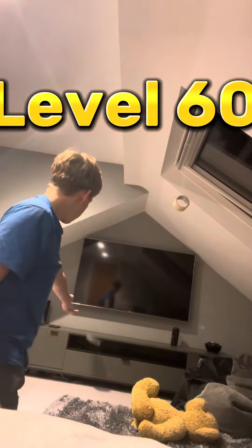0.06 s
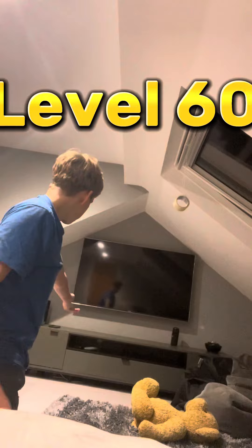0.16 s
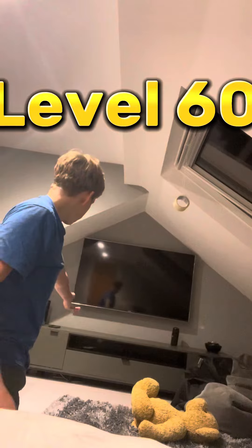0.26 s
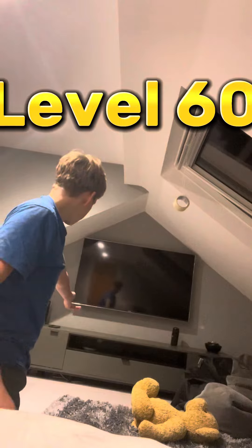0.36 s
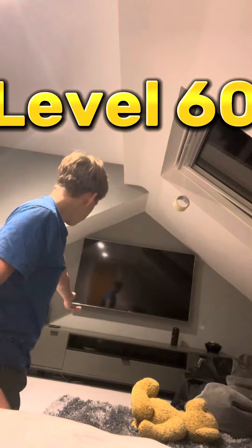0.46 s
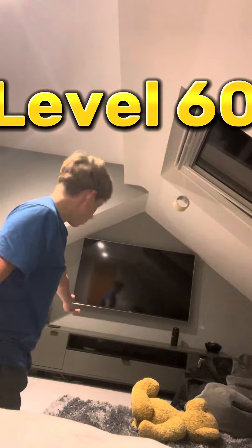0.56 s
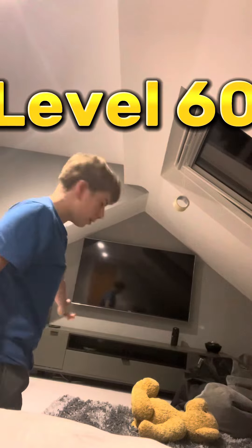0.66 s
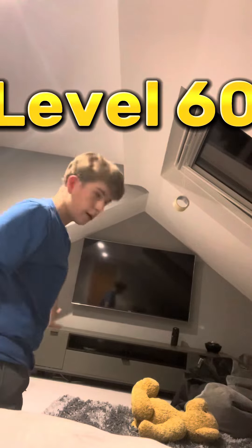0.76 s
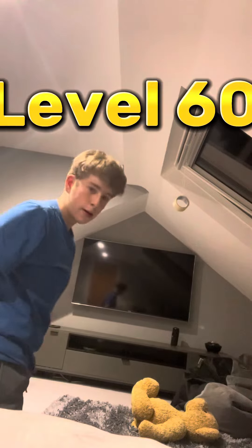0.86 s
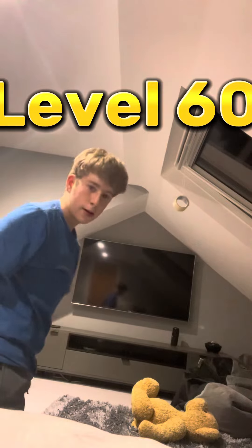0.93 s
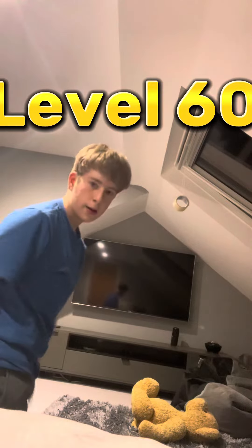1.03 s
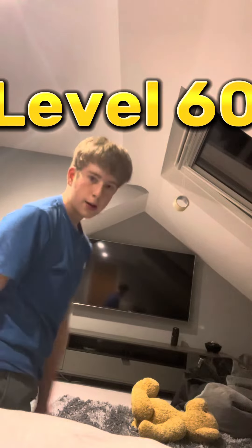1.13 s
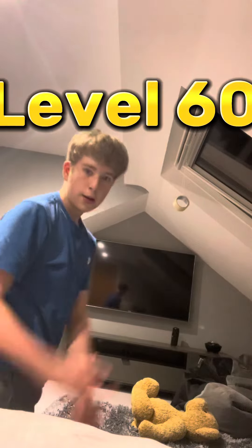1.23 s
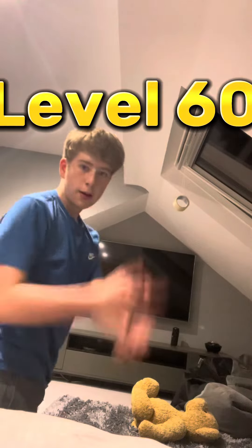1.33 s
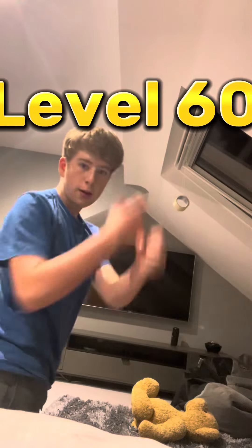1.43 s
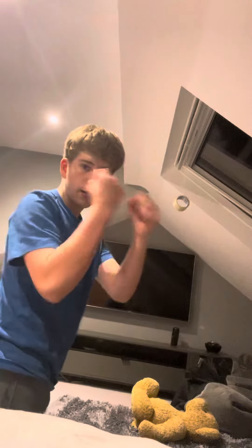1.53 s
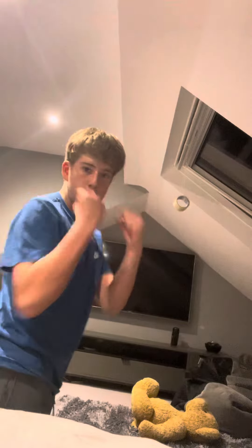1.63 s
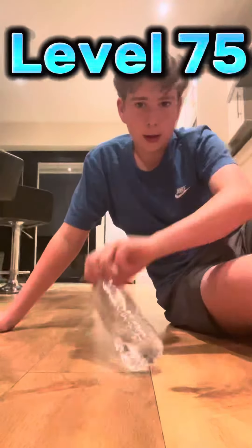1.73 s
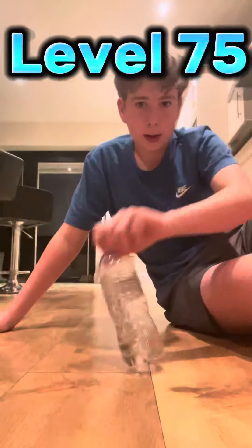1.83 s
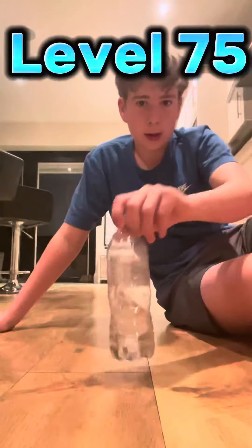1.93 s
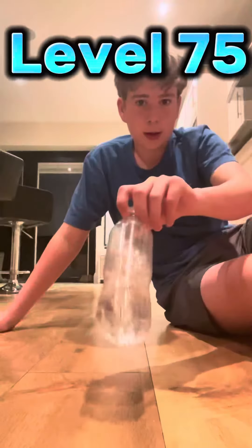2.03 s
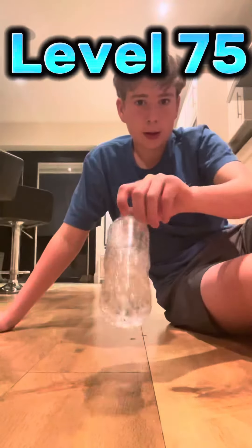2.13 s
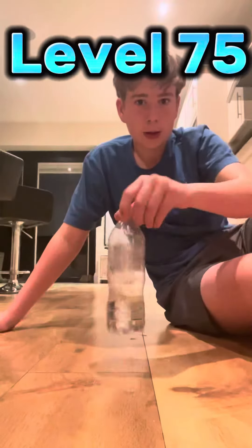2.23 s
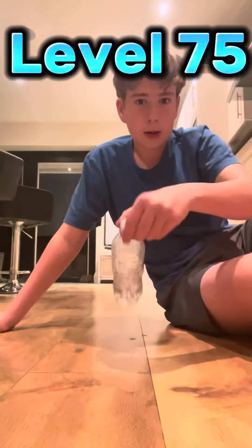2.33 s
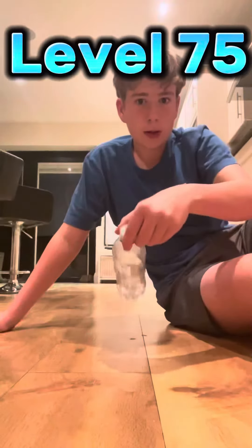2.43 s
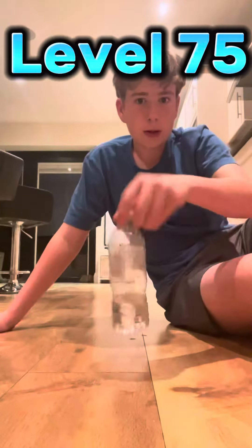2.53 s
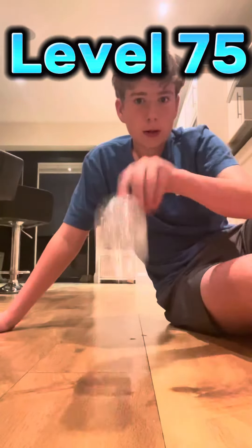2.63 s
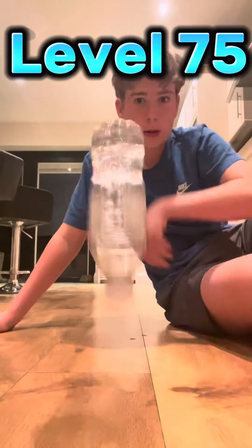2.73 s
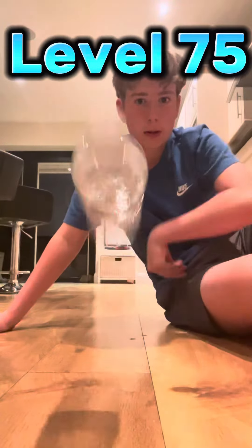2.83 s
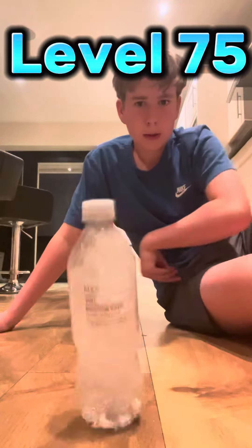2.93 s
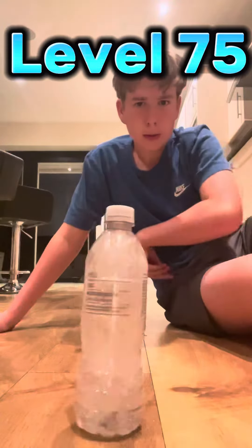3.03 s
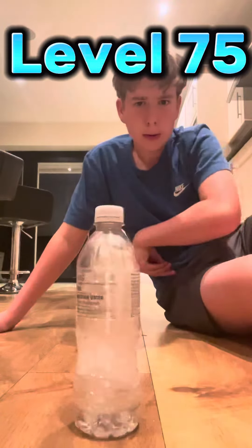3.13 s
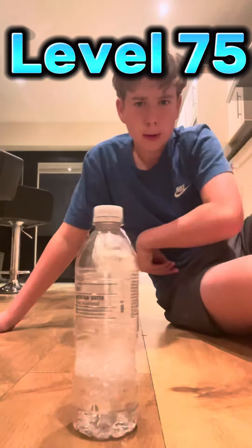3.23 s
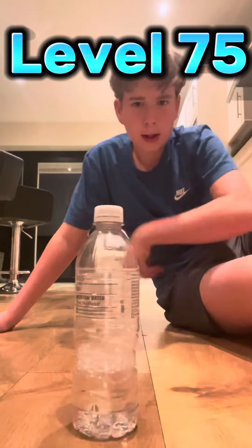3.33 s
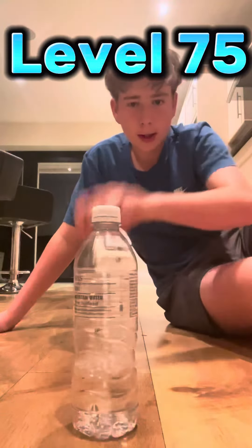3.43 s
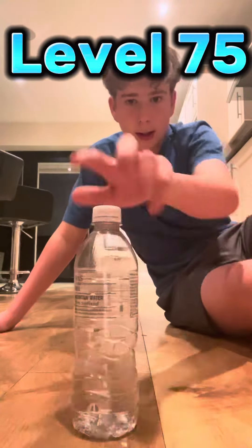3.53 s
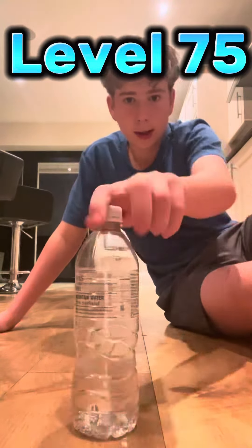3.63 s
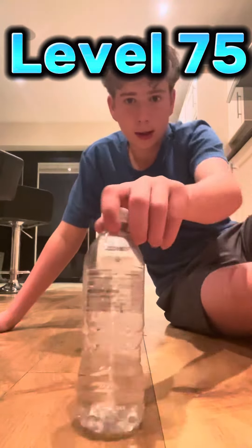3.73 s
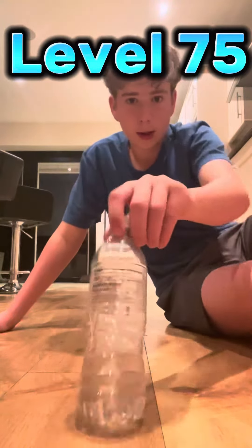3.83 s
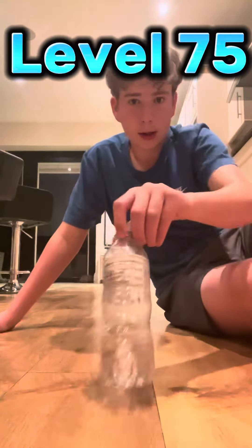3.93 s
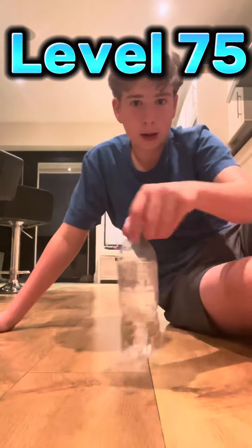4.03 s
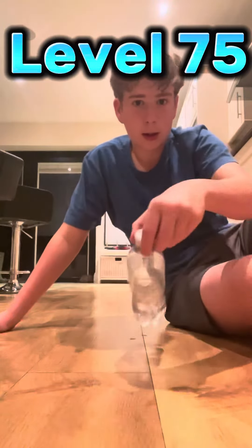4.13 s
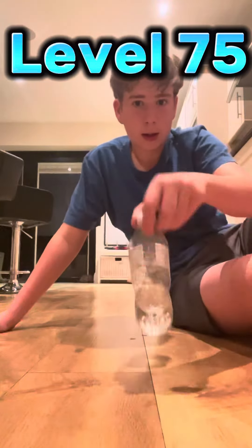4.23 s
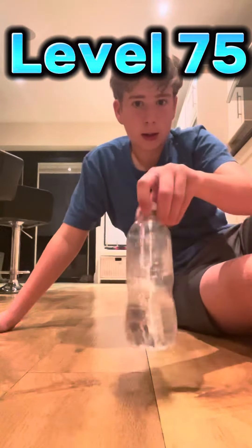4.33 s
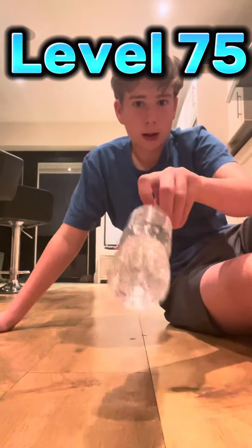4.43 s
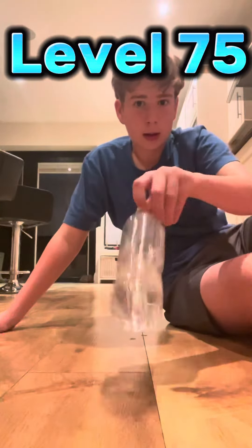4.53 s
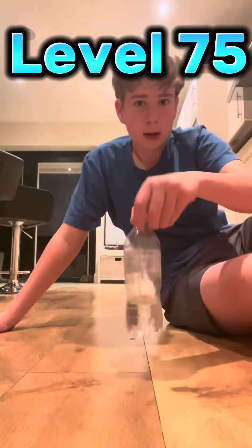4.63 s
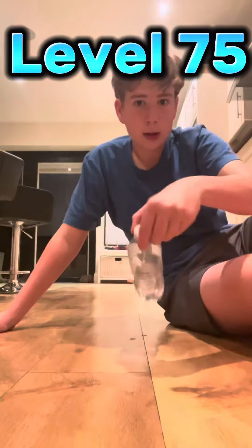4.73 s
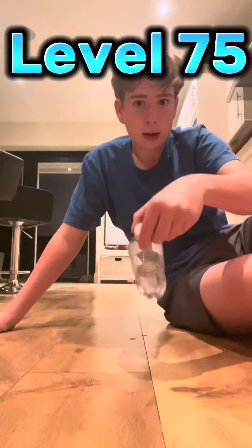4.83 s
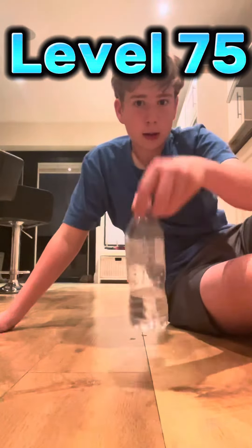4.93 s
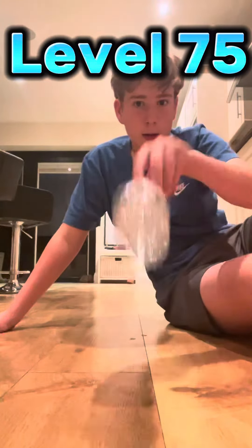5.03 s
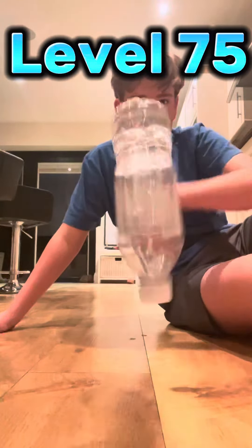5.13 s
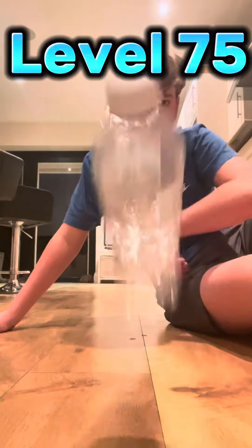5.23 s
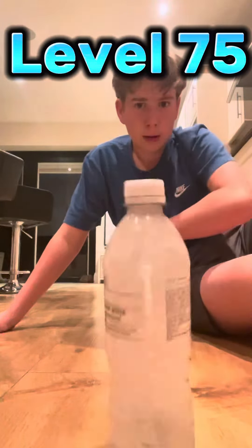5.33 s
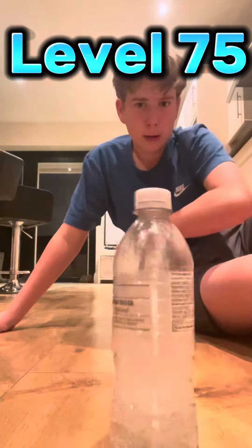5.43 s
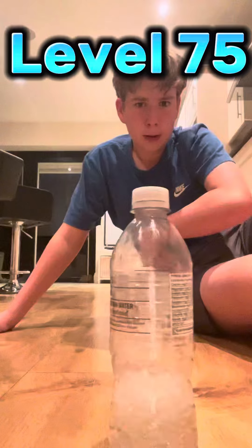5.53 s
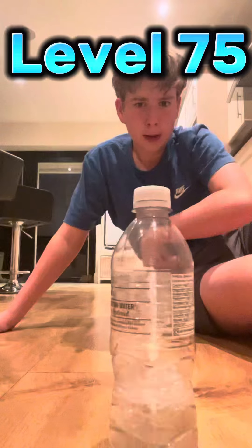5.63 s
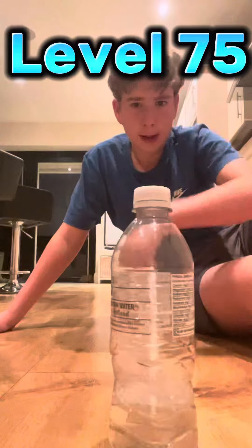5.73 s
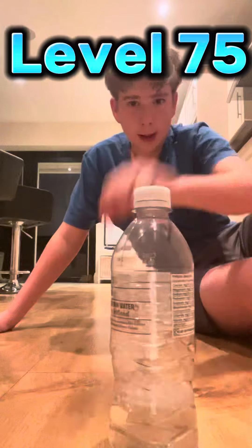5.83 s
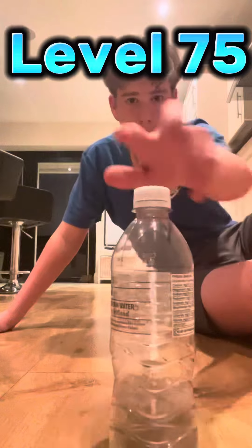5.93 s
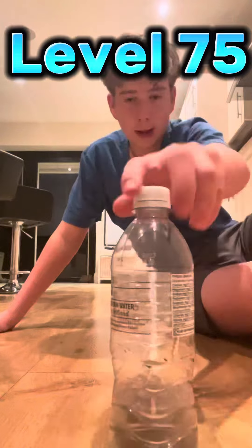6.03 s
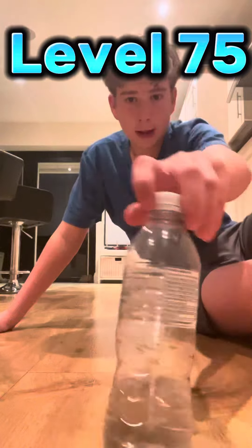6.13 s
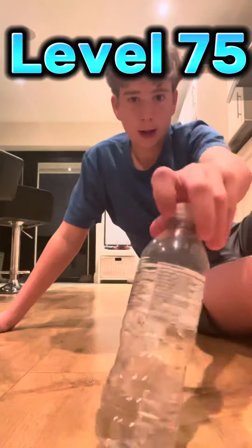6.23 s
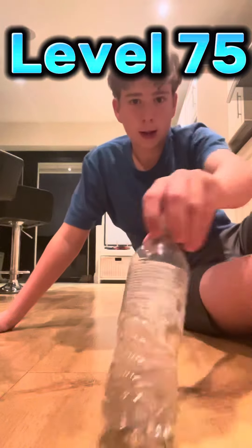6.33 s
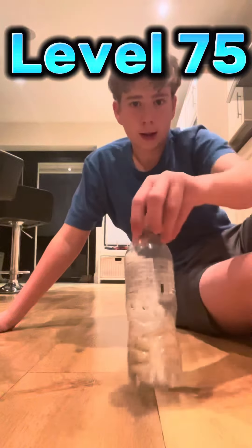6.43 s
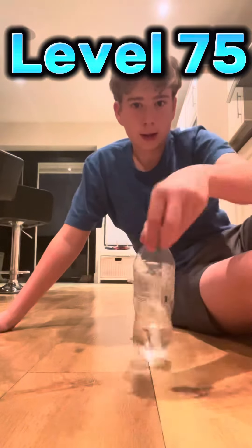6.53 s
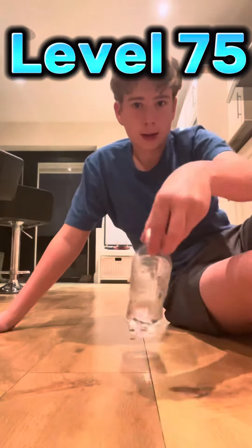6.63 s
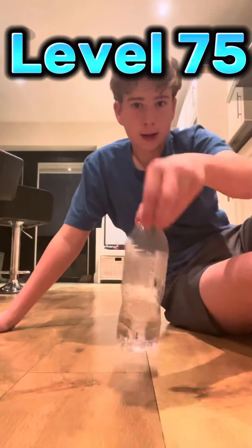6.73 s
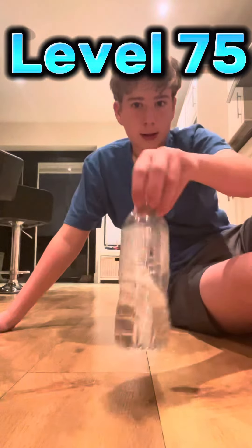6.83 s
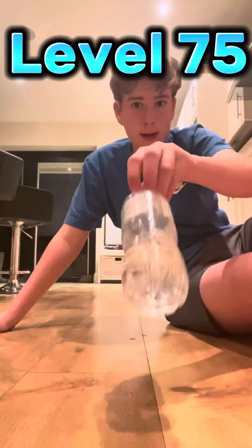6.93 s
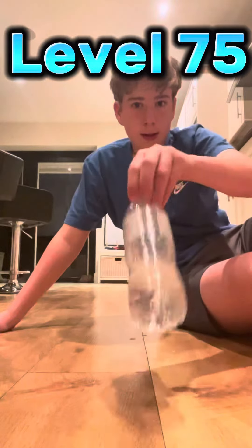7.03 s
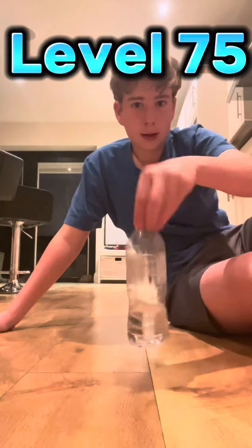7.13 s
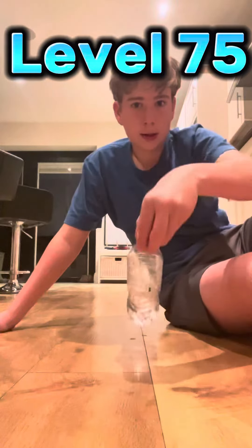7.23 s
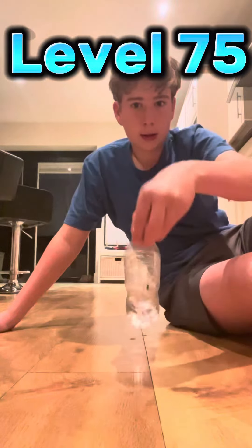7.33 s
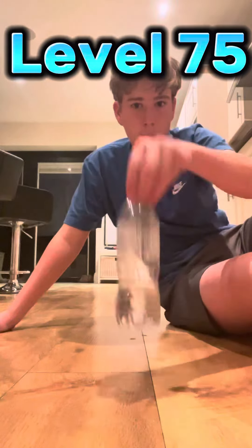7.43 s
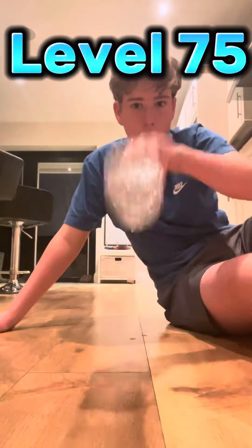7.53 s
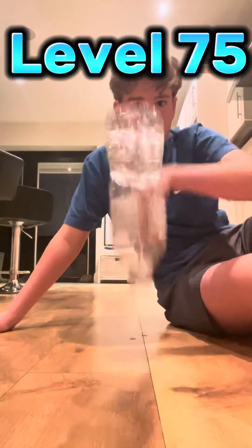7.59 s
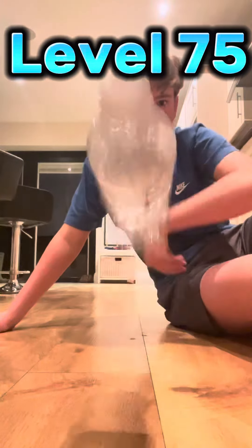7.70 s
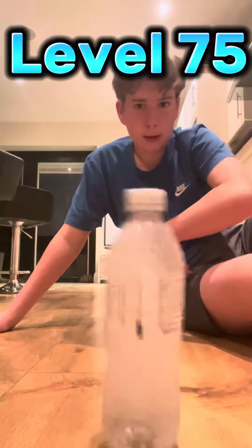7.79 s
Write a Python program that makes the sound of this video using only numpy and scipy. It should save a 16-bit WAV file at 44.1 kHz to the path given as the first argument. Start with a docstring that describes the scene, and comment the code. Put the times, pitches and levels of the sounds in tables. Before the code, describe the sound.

A distant bottle clatters onto a cabinet in an echoing room, then close by water sloshes, plastic snaps and three landings knock a wooden floor.

```python
"""In an attic room with low rumble, a part-filled plastic bottle lands far off on a cabinet: damped modes and a noise
clatter, mostly reverberant, then swells of slosh and rustle. Then a wooden kitchen floor is close by, under a
wavering hum. Three times the bottle is flipped: snapping wall clicks, sloshing water as swells of coloured noise,
a flick of the wrist, then a landing with a low ring of boards and bottle and a crack that sweeps downwards.
The trapped air hoots on low, slightly unsteady notes, each with its own pitch."""
import sys
import numpy as np
from scipy import signal
from scipy.fft import rfft, irfft, next_fast_len
from scipy.io import wavfile
from scipy.ndimage import uniform_filter1d, map_coordinates

SR = 44100
rng = np.random.default_rng(int(sys.argv[2]) if len(sys.argv) > 2 else 0)


def to_wav(s):
    """Save 16-bit WAV."""
    ch = np.atleast_2d(s).T  # columns
    pcm = np.round(np.clip(ch, -1, 1) * 32767)  # PCM
    wavfile.write(sys.argv[1], SR, pcm.astype(np.int16))


N = 346626

# Attic rumble colour. Each row: frequency in Hz, relative density in dB per Hz.
RUMBLE_COLOUR = [(12, -33), (20, -16), (87, -1.5), (130, -19.5), (177, -9), (245, -33.5), (437, -38),
                 (500, -43.5), (650, -72.5), (1100, -120)]
# Colour of the attic's slosh and rustle. Each row: frequency in Hz, relative density in dB per Hz.
ATTIC_NOISE_COLOUR = [(180, -41), (300, -9.5), (434, -5), (471, -9), (762, -6), (1160, -12), (1910, -11.5),
                      (4540, -17.5), (14000, -38)]
# Noise swells in the attic: slosh after the far landing, then rustle.
# Each row: peak in seconds, rise in seconds, fall in seconds, level in dB.
ATTIC_SWELLS = [(.33, 0.24, 0.176, -59), (.45, 0.12, .05, -69.5), (1.23, .15, 0.46, -72.5),
                (1.56, 0.24, 0.1, -68)]
# Kitchen air colour. Each row: frequency in Hz, relative density in dB per Hz.
ROOM_AIR_COLOUR = [(12, -51), (20, -31.5), (47, -17), (141, -0.5), (166, -11.5), (197, -19), (406, -14),
                   (730, -32.5), (11200, -47.5), (15700, -66.5)]
# How alike left and right sound. Each row: frequency in Hz, likeness from -1 to 1.
LIKENESS = [(60, 1), (240, 0.81), (950, 0.22), (3770, -0.053), (15000, 0.93)]
# Reverb decay, stretched by each user's scale. Each row: frequency in Hz, time to fall 60 dB in seconds.
ROOM_DECAY = [(100, .5), (500, .5), (2500, 0.38), (10000, 0.29)]
# Phase lead at the two microphone ports, at full share. Each row: frequency in Hz, left lead in radians.
PORT_LEAD = [(200, -1.16), (600, -0.9), (2070, -1.23), (3100, 1.65), (5170, 2.16), (8800, 0.9),
             (12000, -2.5), (15400, -4.5)]
# Level lean at the two ports, at full share. Each row: frequency in Hz, left minus right in dB.
PORT_LEAN = [(60, -1.5), (180, 0), (550, -4), (1650, -1.5), (4970, 0.5), (15000, 1.5)]
# Where the bottle is. Each row: start in seconds, place by name.
PLACES = [(0, "floor"), (1.8, "hand"), (2.6, "air"), (2.916, "floor"), (3.7, "hand"), (4.95, "air"),
          (5.294, "floor"), (6.38, "hand"), (7.45, "air"), (7.764, "floor")]
# For each place: share of the splash that hisses in the neck (0 to 1).
NECK_SHARE = {"floor": .2, "hand": 0.4, "air": .8}
# For each place: floor thud over the bottle body in dB.
THUD_OVER_BODY_DB = {"floor": 1.5, "hand": -8, "air": -10}
# Surges of water, and at 5.23 s a brief soft noise swell just before the hit.
# Each row: peak in seconds, fall in seconds, splash level in dB, bottle body level in dB.
NOISE_SURGES = [(1.751, .18, -56, -49.5), (1.91, 0.16, -54.5, -64.5), (2.009, 0.2, -62.5, -64),
                (2.153, 0.045, -66, -55.5), (2.93, 0.16, -34, -36.5), (3.09, 0.18, -50, -40),
                (3.229, .05, -75.5, -42), (3.29, 0.13, -73.5, -50.5), (3.52, 0.083, -88, -51),
                (3.64, 0.06, -68, -51), (3.835, 0.077, -53, -56.5), (4.12, 0.063, -73, -62),
                (4.296, 0.068, -49.5, -54), (5.23, 0.014, -31, -55), (5.308, 0.12, -32, -39),
                (5.411, 0.21, -48, -41.5), (5.518, 0.089, -50.5, -44.5), (5.75, 0.16, -68.5, -56.5),
                (5.93, 0.046, -77, -59), (6.019, 0.076, -69, -47), (6.075, .075, -66, -52),
                (6.188, .11, -62.5, -49), (6.259, 0.026, -58, -61), (6.31, 0.077, -69.5, -47.5),
                (6.423, 0.076, -50, -55), (6.8, .12, -65.5, -66), (7.699, 0.048, -44, -46),
                (7.789, 0.11, -30, -31.5)]
# Flicks of the wrist. Each row: peak in seconds, splash level in dB.
THROWS = [(2.668, -48.5), (5.055, -46.5), (7.549, -47)]
# Water spatter colour. Each row: frequency in Hz, relative density in dB per Hz.
SPLASH_COLOUR = [(350, -32), (600, -4), (929, -11), (1140, -13), (1790, -15), (2880, -14.5), (4520, -21),
                 (6720, -24), (12800, -35.5), (15700, -46.5)]
# Resonances of the bottle's body. Each row: centre in Hz, width in Hz, relative level in dB.
BODY_RESONANCES = [(217, 45, -8.5), (286, 30, -2.5), (415, 40, -3.5), (520, 74, -10.5), (634, 71, -14.5)]
# Resonances of the bottle's neck. Each row: centre in Hz, width in Hz, relative level in dB.
NECK_RESONANCES = [(2160, 190, 0), (2933, 170, 2), (3460, 240, -9.5), (6520, 580, -11.5)]
# Hoots of the trapped air after a landing. Each row: start in seconds, hold in seconds, pitch in Hz, level in dB.
LANDING_HOOTS = [(2.96, 0.02, 300.3, -35), (3.138, 0.018, 262, -40), (5.305, .012, 282.3, -17),
                 (5.369, .12, 286, -35.5)]
# The hoot of each flick. Single row: delay in seconds, hold in seconds, pitch in Hz, level over splash in dB.
THROW_HOOT = (0.03, 0.0536, 272, -1.5)
# Snaps of the bottle wall, and the first edge touch at 5.238 s.
# Each row: time in seconds, dry peak before the room in dB, centre in Hz.
CLICKS = [(1.742, -41.5, 1330), (1.795, -38.5, 3830), (1.88, -48, 2880), (1.908, -38.5, 2180),
          (1.975, -41.5, 3550), (1.995, -36, 1628), (2.144, -42.5, 1860), (2.805, -48, 6253),
          (2.859, -41.5, 1915), (2.873, -33, 1800), (3.201, -47.5, 7950), (3.211, -43, 2500),
          (3.262, -46, 3313), (3.845, -41.5, 3466), (4.303, -32, 3320), (4.404, -44.5, 2315),
          (4.968, -54.5, 2960), (5.051, -35, 2802), (5.2383, -17.5, 1800), (6.032, -45.5, 2570),
          (6.08, -52, 2600), (6.13, -45.5, 3455), (6.176, -45, 3200), (6.215, -50, 2300),
          (6.247, -51, 2880), (6.337, -52, 6000), (6.392, -48, 7050), (6.779, -41, 2710),
          (7.497, -33, 2554), (7.543, -31.5, 2390), (7.551, -27.5, 2940), (7.629, -44, 6830),
          (7.681, -24, 2950), (7.744, -28, 3000)]
# Blows on the far cabinet. Each row: time in seconds, relative level in dB.
FAR_BLOWS = [(0.138, -36), (0.154, -26.5), (0.166, -18), (0.173, -19), (0.314, -30.5), (0.344, -38),
             (0.379, -49), (0.43, -52)]
# Cabinet modes. Each row: frequency in Hz, relative level in dB, time to fall 60 dB in seconds.
CABINET_MODES = [(76, -14.5, .2), (131.3, -12.5, 0.14), (190.4, -10, 0.16), (261.2, -12, 0.17),
                 (400, -14.5, 0.086), (699.5, -13, .08), (955, -10.5, 0.12), (1269, -1, 0.099),
                 (1544, -6, 0.052), (1917, -3.5, 0.13), (2300, -11.5, 0.061)]
# Blows on the boards. Each row: time in seconds, relative level in dB, low ring in dB over it, crack in dB over it.
BLOWS = [(2.9163, -1, -1, -1), (2.924, -14.5, 0, -12.5), (5.2391, -17, -13, 1.5), (5.2936, -5, 1.5, 3.5),
         (5.301, -11.5, 2.5, -9.5), (7.764, -24, 4.5, -3), (7.770, -21, 3.5, -6.5), (7.776, -14, 1, 2.5),
         (7.783, -8.5, -0.5, -4), (7.793, -11, 2.5, -27)]
# Modes of the floor boards and bottle at a landing.
# Each row: frequency in Hz, relative level in dB, time to fall 60 dB in seconds.
LANDING_MODES = [(62, -9, .2), (95, -3, 0.16), (126, -3.5, 0.098), (229, -9, 0.11), (296.3, 1.5, 0.11),
                 (409, -4, 0.046), (505.7, -5, 0.1), (596, -9, 0.023), (662.7, -4, 0.092),
                 (806, -13, 0.021), (989, -9, 0.08), (1040, -9.5, 0.022), (1345, -5.5, 0.02),
                 (1530.5, -8, 0.048)]
# Colour of the landing's crack. Each row: frequency in Hz, relative density in dB per Hz.
CRACK_COLOUR = [(530, -37.5), (900, -2), (1640, -9), (2130, -13), (2770, -5.5), (4680, -16.5),
                (9600, -21.5), (12600, -31.5), (15700, -65)]

ROOM_CHANGE_S, TOP_HZ = 1.68, 15820  # attic gives way to kitchen; upper band limit
RUMBLE_DB, STILL_DB, RUMBLE_SWELL_DB = -59, -83, 2  # rumble and rustle at rest; rumble over the noise in a swell
HUM_HZ, HUM_DB = 140.3, -64.5  # centres of the wavering pitch and level
HUM_DIP_DB, HUM_BACK_S = 8.5, .5  # depth of the dip at a landing, time constant of its return
SURGE_RISE_S, RISE_OVER_FALL = 0.011, .22  # a long surge also builds slowly
THROW_RISE_S, THROW_FALL_S, THROW_BODY_DB = .045, .085, 2  # body over splash
HOOT_RISE_S, HOOT_FALL_S = .022, .06  # times to change by 20 dB


def amp(db):
    """Decibels to linear gain."""
    return 10 ** (np.asarray(db) / 20)


def unit(x):
    """Scale to an rms of 1."""
    return x / np.sqrt(np.mean(x ** 2) + 1e-20)


def along(points, hz):
    """Read (Hz, value) points along a log frequency axis."""
    f, v = np.transpose(points)
    return np.interp(np.log(hz + 1), np.log(f + 1), v)


def colour(spectrum):
    """Gain over frequency from a table of densities."""
    return lambda hz: amp(along(spectrum, hz))


def wobble(rate):
    """A smooth random curve, rate knots a second."""
    knots = rng.standard_normal(int(N * rate / SR) + 4)
    return map_coordinates(knots, [np.arange(N) * rate / SR])


def filtered(x, response):
    """Shape x by a complex response of frequency."""
    m = next_fast_len(x.shape[-1] + 8192)
    spectrum = rfft(x, m) * response(np.fft.rfftfreq(m, 1 / SR))
    return irfft(spectrum, m)[..., :x.shape[-1]]


def resonances(modes):
    """Causal response of damped resonances, alternating in sign."""
    def response(f):
        return sum((-1) ** k * amp(db) * 1j * f * width / (centre ** 2 - f * f + 1j * f * width)
                   for k, (centre, width, db) in enumerate(modes))
    return response


def stereo(pair, gain=lambda hz: 1):
    """Turn two independent noises into left and right that are as alike as LIKENESS says."""
    def mid_side(hz):
        turn = np.arccos(np.clip(along(LIKENESS, hz), -1, 1)) / 2
        return gain(hz) * np.array([np.cos(turn), np.sin(turn)])
    mid, side = filtered(pair, mid_side)
    return np.array([mid + side, mid - side])


def rush(gain, grain_db=0, grain_rate=100):
    """Stereo noise of rms 1 with a colour, lumpy in time."""
    lumps = amp(grain_db * wobble(grain_rate))
    return unit(stereo(rng.standard_normal((2, N)) * lumps, gain))


def patchy(x, depth_db):
    """Random patches of gain across time and frequency."""
    z = signal.stft(x, nperseg=512)[2]
    field = uniform_filter1d(rng.standard_normal(z.shape[1:]), size=7, axis=0)
    field = uniform_filter1d(field, size=9, axis=1)
    return unit(signal.istft(z * amp(depth_db * unit(field)), nperseg=512)[1][:, :N])


def swells(rows, gains):
    """Envelopes of events that grow by 20 dB over their rise and lose 20 dB over their fall; a row per layer."""
    out = np.zeros((len(gains), N))
    for (s, rise, fall), gain in zip(rows, np.transpose(gains)):
        first, last = max(round((s - 3 * rise) * SR), 0), min(round((s + 3 * fall) * SR), N)
        span = np.arange(first, last)
        t = span / SR - s
        out[:, span] += gain[:, None] * amp(-20 * np.maximum(-t / rise, t / fall))
    return out


def ring(modes, t, spread_db, wander):
    """Damped modes at new strengths for each blow; their phases wander at random, which roughens the ring."""
    out = np.zeros(len(t))
    for hz, db, t60 in modes:
        walk = wander * np.cumsum(rng.standard_normal(len(t))) / np.sqrt(SR)
        decay = amp(db + rng.normal(0, spread_db) - 60 * t / t60)
        out += decay * np.sin(2 * np.pi * hz * t + hz / 20 * walk)
    return out


def add(track, s, sound):
    """Mix a sound in from time s."""
    part = track[round(s * SR):][:len(sound)]
    part += sound[:len(part)]


def ports(x, share):
    """One source at two microphone ports: a share of the lead and lean; long waves reach both in step."""
    def half(hz):
        short_waves = hz ** 4 / (hz ** 4 + 350 ** 4)
        lean = amp(share * along(PORT_LEAN, hz) / 2)
        return lean * np.exp(.5j * share * short_waves * along(PORT_LEAD, hz))
    return filtered(x, lambda hz: np.array([half(hz), 1 / half(hz)]))


def room(x, decays, scale, wet_db, share):
    """Direct sound plus a tail in which each frequency dies at its own speed."""
    hz, t, z = signal.stft(rng.standard_normal((2, SR * 3 // 4)), SR, nperseg=256)
    t60 = scale * along(decays, hz)[:, None]
    tail = signal.istft(z * amp(-60 * t / t60), SR, nperseg=256)[1]
    tail = stereo(tail / np.linalg.norm(tail[0]))
    delayed = np.pad(x, (150, 0))[None]  # samples before the tail
    wet = signal.fftconvolve(delayed, tail, axes=1)[:, :N]
    return ports(x, share) + amp(wet_db) * wet


def attic():
    """Low rumble and patchy noise, swelling together: slosh after the far landing, then rustle."""
    rows = np.array(ATTIC_SWELLS)
    swell, = swells(rows[:, :3], [amp(rows[:, 3])])
    rumble = rush(colour(RUMBLE_COLOUR), grain_db=3.5, grain_rate=14)
    slosh_and_rustle = patchy(rush(colour(ATTIC_NOISE_COLOUR)), depth_db=2.5)
    rumble_level = amp(RUMBLE_DB) + amp(RUMBLE_SWELL_DB) * swell
    return rumble_level * rumble + (amp(STILL_DB) + swell) * slosh_and_rustle


def kitchen_air():
    """An appliance hum, one sine wavering in pitch and level and dipping at landings, over faint room noise."""
    t = np.arange(N) / SR
    dip = sum((t > s) * np.exp(-np.abs(t - s) / HUM_BACK_S) for s, place in PLACES if place == "floor")
    level = amp(HUM_DB - HUM_DIP_DB * dip + 1.8 * wobble(22))
    cycles = np.cumsum(HUM_HZ + 4.5 * wobble(16)) / SR
    hum = np.sqrt(2) * level * np.sin(2 * np.pi * cycles)
    return hum + amp(-66.5) * rush(colour(ROOM_AIR_COLOUR))


def slosh():
    """Water spatters on the wall, hisses in the neck, shakes the bottle's body and, by hand and base, the floor."""
    rows = [(s, SURGE_RISE_S + RISE_OVER_FALL * fall, fall, db, body_db) for s, fall, db, body_db in NOISE_SURGES]
    rows += [(s, THROW_RISE_S, THROW_FALL_S, db, db + THROW_BODY_DB) for s, db in THROWS]
    rows = np.array(rows)
    places = [[place for start, place in PLACES if start <= s][-1] for s in rows[:, 0]]
    share = np.clip([NECK_SHARE[place] for place in places], 0, 1)
    splash_gain, body_gain = amp(rows[:, 3:].T)
    thud_gain = body_gain * amp([THUD_OVER_BODY_DB[place] for place in places])
    # the square roots split the splash by power
    gains = [splash_gain * np.sqrt(1 - share), splash_gain * np.sqrt(share), body_gain, thud_gain]
    spatter, hiss, body, thud = swells(rows[:, :3], gains)
    boards = lambda f: (f / 70) ** 3 / (1 + (f / 75) ** 6)
    out = spatter * patchy(rush(colour(SPLASH_COLOUR), grain_db=2.5, grain_rate=160), depth_db=2.2)
    out += hiss * rush(resonances(NECK_RESONANCES), grain_db=2.5, grain_rate=120)
    out += body * rush(resonances(BODY_RESONANCES), grain_db=3.5, grain_rate=60)
    return out + thud * rush(boards, grain_db=4, grain_rate=17)


def hoots():
    """The trapped air sings low, slightly unsteady notes, each with its own pitch, while the water pumps it."""
    lag, hold, hz, over_db = THROW_HOOT
    rows = LANDING_HOOTS + [(s + lag, hold, hz, db + over_db) for s, db in THROWS]
    s, hold, hz, db = np.transpose(rows)[..., None]
    t, waver = np.arange(N) / SR, np.cumsum(5 * wobble(30))
    fade = np.maximum(np.maximum((s - t) / HOOT_RISE_S, (t - s - hold) / HOOT_FALL_S), 0)
    notes = amp(db - 20 * fade) * np.sin(2 * np.pi * (hz * t + waver / SR))
    return ports(np.sqrt(2) * amp(1.5 * wobble(40)) * notes.sum(axis=0), share=.6)


def clicks():
    """A dent in the wall flips, or an edge first touches: a short puff of noise rings around one pitch."""
    out, t = np.zeros(N), np.arange(SR // 16) / SR
    for s, db, centre_hz in CLICKS:
        def peak(f):
            broad = .12 * f / (f + 900) / (1 + (f / 9000) ** 4)
            return broad + 1j * f * 600 / (centre_hz ** 2 - f * f + 1j * f * 600)  # 600 Hz wide
        puff = (1 - np.exp(-t / 0.0018)) * amp(-60 * t / 0.022) * rng.standard_normal(len(t))
        click = filtered(puff, peak)
        add(out, s - .001, amp(db) * click / np.abs(click).max())
    return room(out, ROOM_DECAY, scale=0.83, wet_db=-8.5, share=0.79)


def far_landing():
    """The cabinet clatters under each blow, modes plus decaying noise, heard mostly through the room."""
    out, t = np.zeros(N), np.arange(SR // 3) / SR
    dull = lambda hz: (1 + 1j * hz / 2200) ** -2 / (1 + (hz / 11000) ** 12)
    for s, db in FAR_BLOWS:
        modes = ring(CABINET_MODES, t, spread_db=1.5, wander=.4)
        clatter = amp(-60 * t / 0.066) * rng.standard_normal(len(t))
        onset = 1 - np.exp(-t / 0.002)
        add(out, s - .002, amp(db - 5) * filtered(onset * (modes + 1.4 * clatter), dull))
    return room(out, ROOM_DECAY, scale=0.73, wet_db=-0.5, share=0.31)


def landings():
    """Boards and bottle ring low; bending waves carry the treble first, so each blow sweeps downwards."""
    low, sharp, t = np.zeros(N), np.zeros(N), np.arange(SR // 3) / SR
    for s, db, weight_db, crack_db in BLOWS:
        add(low, s, amp(db + weight_db - 6) * ring(LANDING_MODES, t, spread_db=2.0, wander=.7))
        burst = amp(-60 * t / 0.089) * rng.standard_normal(len(t)) * 0.16
        burst[0] = 3.2  # the instant of contact
        add(sharp, s, amp(db + crack_db) * burst)
    sharp = amp(14.5) * filtered(sharp, colour(CRACK_COLOUR))

    def bending(hz):
        phase = 2 * np.pi * .12 * (np.sqrt(hz) - hz / np.sqrt(4 * TOP_HZ))  # no delay at TOP_HZ
        return np.exp(-1j * phase) * hz / (hz + 40)
    return room(filtered(low + sharp, bending), ROOM_DECAY, scale=0.66, wet_db=-14.5, share=0.74)


def scene():
    """The attic and then the kitchen, with a 5.8 ms crossfade."""
    later = np.clip((np.arange(N) / SR - ROOM_CHANGE_S) / 0.0058, 0, 1)
    far_room = attic() + far_landing()
    near_room = kitchen_air() + slosh() + hoots() + clicks() + landings()
    return (1 - later) * far_room + later * near_room


def record(dry):
    """The microphone adds a steady hiss; peaks are softly held; nothing passes above the band limit."""
    hiss = amp(-93) * filtered(rng.standard_normal((2, N)), lambda hz: 1 / (1 + (hz / 11500) ** 8))
    held = (dry + hiss) / (1 + np.abs(dry) ** 6) ** (1 / 6)
    return filtered(held, lambda hz: hz < TOP_HZ)


dry = scene()
out = record(dry)
to_wav(out)
```